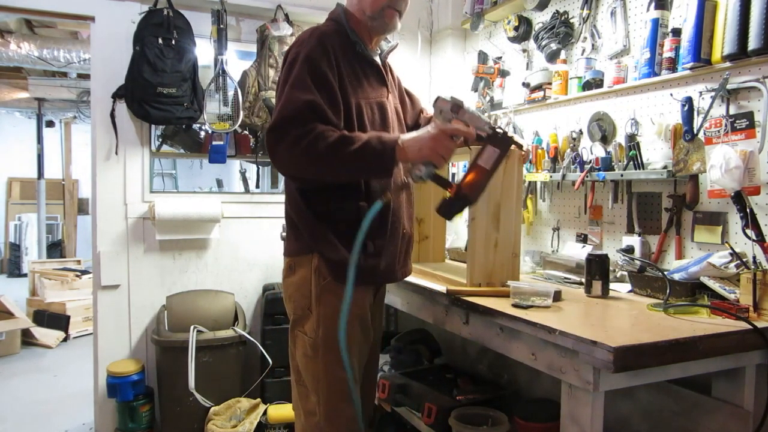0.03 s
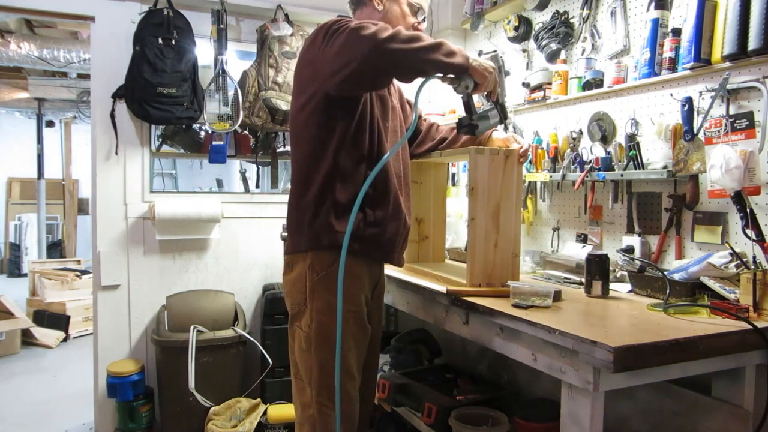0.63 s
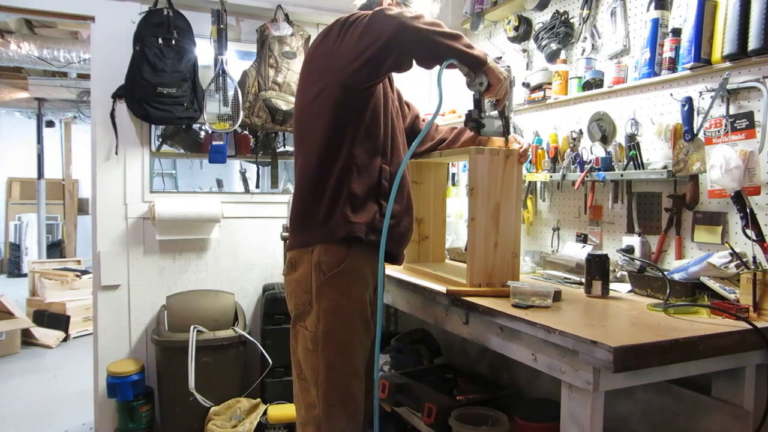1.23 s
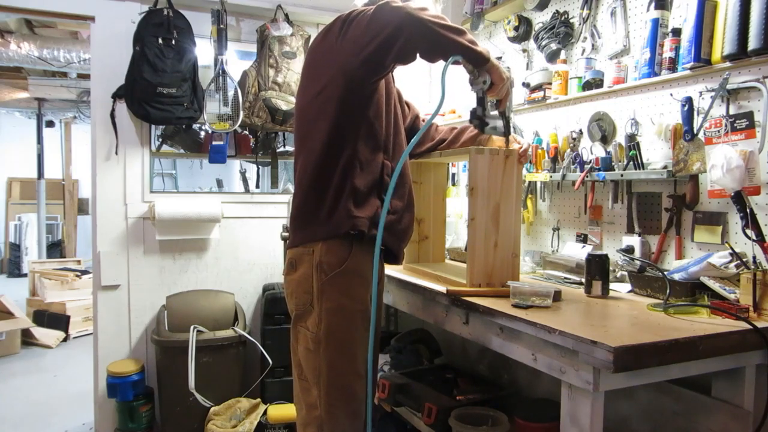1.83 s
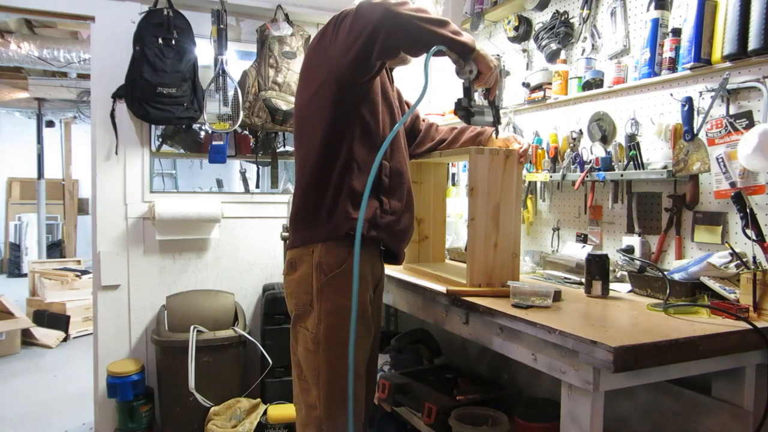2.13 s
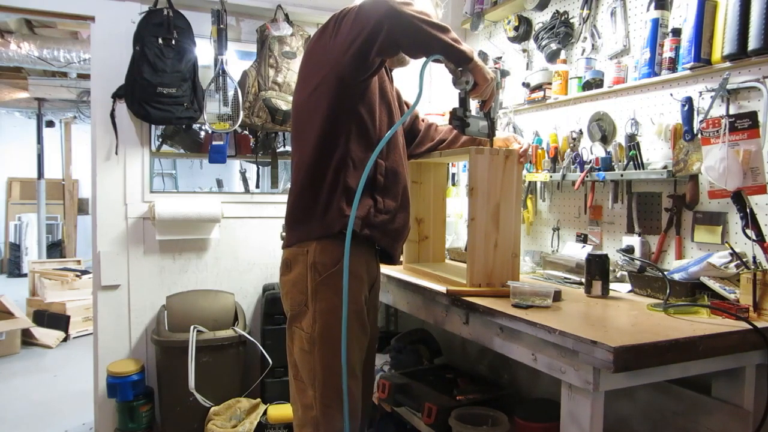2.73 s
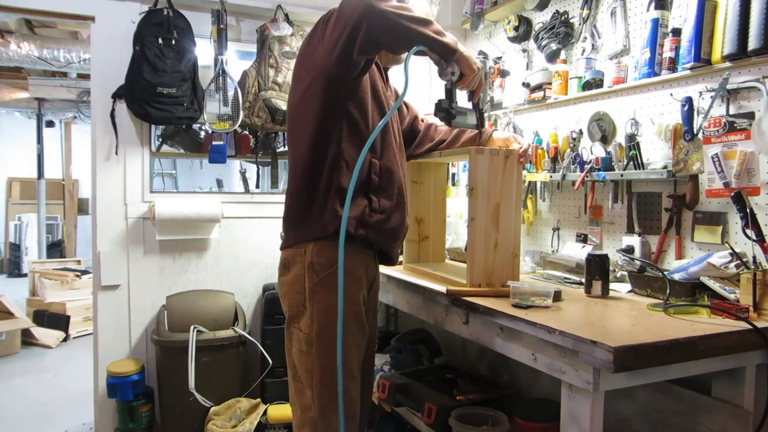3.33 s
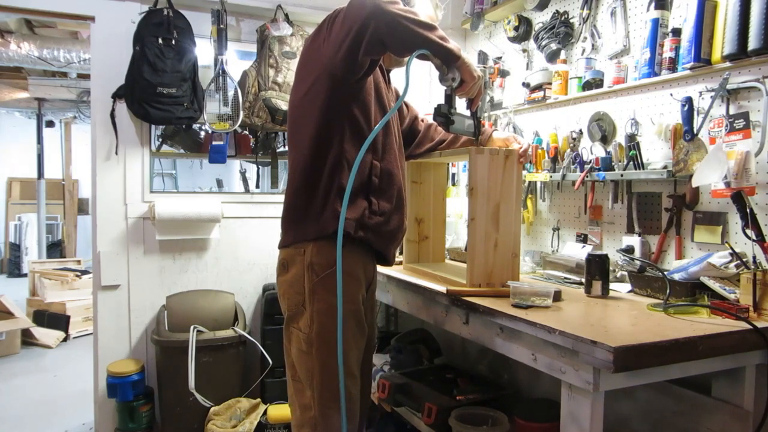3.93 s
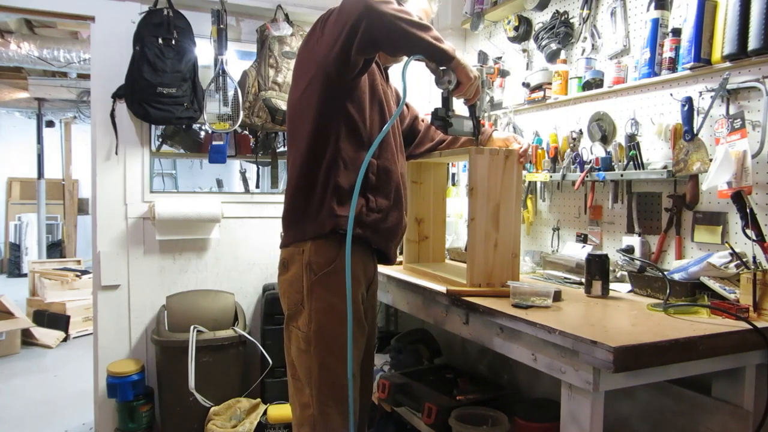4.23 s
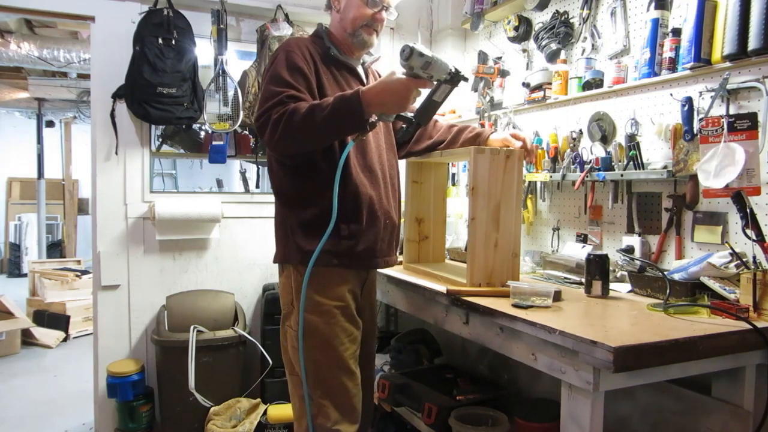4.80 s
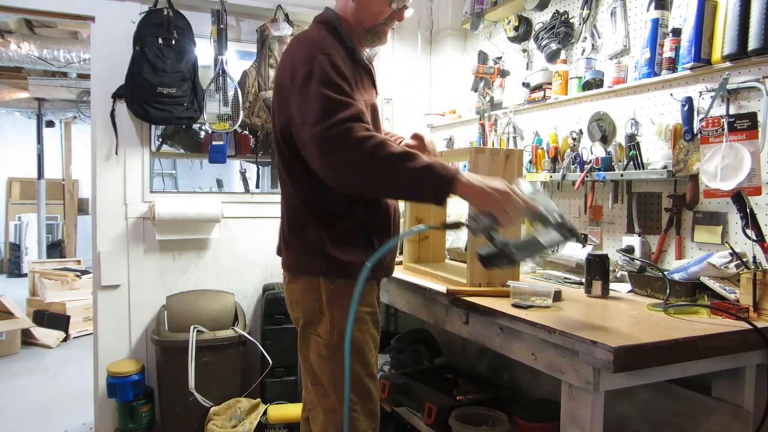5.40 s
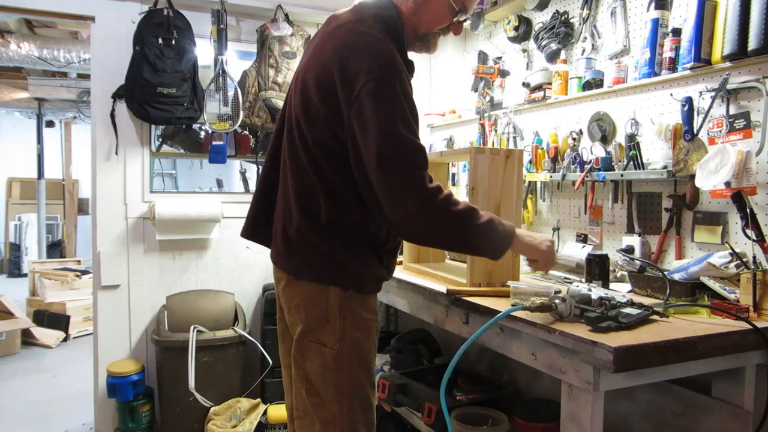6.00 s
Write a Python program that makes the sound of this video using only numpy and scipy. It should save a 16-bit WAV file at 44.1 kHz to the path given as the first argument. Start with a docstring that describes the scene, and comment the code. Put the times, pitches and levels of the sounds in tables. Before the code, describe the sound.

Close by in a small, quiet workshop, an air nailer knocks lightly against a wooden box and fires twice, each loud crack chased by a short hiss of vented air and a low thump. During a pause, a sleeve brushes softly, the tool clicks and the faint room hum swells a little. Three more evenly paced shots follow, with small metallic clicks and wooden taps between them and only a brief echo off the walls.

```python
"""In a small, humming workshop a pneumatic nailer clicks and is set down on a wooden box.
A valve ticks and the driver slams a nail home with a hard crack; as the trigger is let go, the cylinder
vents with a hissing blast. Both blasts carry a rough tone that dives into the bass and ends in a thump.
After the second nail comes a long pause: a sleeve brushes by, the room swells and its thin whistle fades.
Three more nails follow, with light clicks and knocks between them."""
import sys
import numpy as np
from scipy import signal
from scipy.fft import rfft, irfft, next_fast_len
from scipy.io import wavfile

SR = 44100
rng = np.random.default_rng(int(sys.argv[2]) if len(sys.argv) > 2 else 0)


def dump_mix(stems):
    """Bounce the given channels to the path in sys.argv[1] as a 16-bit WAV at rate SR."""
    frames = np.atleast_2d(stems).T  # one column per channel
    limited = np.clip(frames, -1, 1)  # hard clip at full scale
    pcm = np.round(limited * 32767).astype(np.int16)
    wavfile.write(sys.argv[1], SR, pcm)


N = 266893
T = np.arange(SR // 2) / SR  # seconds since an event began

# cues for the driver's blows: t/s, dive length/s, dive end f/Hz
SHOTS = [(0.389, 0.058, 440), (1.354, 0.054, 560), (3.3803, 0.062, 380), (4.4556, 0.058, 270),
         (5.6279, 0.047, 803)]
# cues for the exhaust blasts: t/s, dive length/s, dive end f/Hz, dive gain/dB
VENTS = [(0.532, 0.08, 183.2, -12), (1.4971, 0.06, 657, -11.5), (3.517, 0.066, 139.5, -13),
         (4.589, 0.06, 597.3, -11), (5.757, 0.071, 330.3, -15)]
# cues for trigger and safety tip: t/s, body clack gain/dB, steel tick over the clack/dB
CLICKS = [(0.067, -46.5, 2.5), (0.284, -58.5, 1), (1.04, -48, 3), (1.28, -55, 1), (2.409, -51, 2),
          (2.5, -57.5, -6), (2.53, -60, -0.5), (2.598, -54, -2.5), (3.277, -60.5, 5.5), (3.9, -66, 2.5),
          (3.971, -67, 6), (4.997, -59.5, -1.5), (5.099, -63, -4), (5.139, -54.5, 5), (5.549, -57, 1.5)]
# cues for knocks on the box: t/s, wood thud gain/dB, body clack over the thud/dB
KNOCKS = [(0.131, -39, -3.5), (1.072, -35, -5.5), (2.026, -64.5, -15), (2.786, -47, -18.5),
          (4.234, -48, -1), (5.346, -48, -11.5)]

# noise colours: f/Hz, relative level/dB
VALVE = [(100, -21), (700, -11.5), (2500, -2), (5000, -7), (10000, -10.5), (16000, -20.5)]  # the trigger valve opening
CRACK = [(30, -22), (300, -15.5), (800, -5), (1600, 3.5), (2700, 3.5), (4500, -11), (10000, -22),
         (16000, -31)]  # the driver's impact
SHOT_ECHO = [(60, -24.5), (300, -12.5), (800, -3.5), (2400, -0.5), (4500, -8), (8000, -7.5), (12000, -12.5),
             (16000, -16.5)]  # the shot coming back off the walls
SNAP = [(200, -22), (900, -10), (2000, -3), (2900, 0.5), (4200, -11.5), (9000, -12), (16000, -23.5)]  # the valve's return
EXHAUST = [(60, -20), (300, -5.5), (1000, 0.5), (2500, 0.5), (5000, -7), (8000, -0.5), (12000, -1.5),
           (16000, -11)]  # air dumped from the cylinder
AFTER_HISS = [(100, -30.5), (600, -24.5), (1500, -11.5), (3000, -5), (6500, 1), (10000, -1.5), (16000, -10)]  # a faint hiss that lingers after the blast
THUMP = [(15, 3), (35, 1.5), (90, -4), (200, -11), (500, -40), (2000, -82.5)]  # the rumble that ends a dive
THUD = [(30, -20), (90, -7), (170, 0), (420, -2), (600, -12), (2000, -36), (8000, -70)]  # a touch on wood
CLACK = [(200, -23), (600, -4), (1500, -3), (3000, -3), (4500, -10.5), (10000, -32.5)]  # a touch on the tool's body
TICK = [(1500, -26), (3500, -1), (6500, 0.5), (10000, -7.5), (16000, -18)]  # a touch on steel
SLEEVE = [(200, -10), (900, -9), (2200, 1.5), (4500, -2.5), (8000, -12.5), (15000, -23)]  # brushing cloth
ROOM_AIR = [(20, -16.5), (70, -10.5), (130, -10.5), (220, -17), (500, -15), (1200, -8), (3000, -18),
            (7000, -21.5), (11000, -26), (15000, -34)]  # the room at rest

# the noise band of a dive: f/pitch, level/dB
DIVE_BAND = [(.03, -26.5), (.3, -15.5), (.58, -5), (.85, -1), (1.15, -4), (1.6, -9), (2.5, -17.5), (5, -36),
             (12, -59)]
# a dive's strength as its pitch falls: f/Hz, level/dB
DIVE_LEVEL = [(100, -14), (200, -11.5), (500, -7.5), (1000, -3), (2000, -0.5), (3500, 0), (5500, 1.5),
              (8000, -18)]

# struck resonances: f/Hz, level/dB, t60/s
BOX_MODES = [(158, -2, .16), (345, -1, .22), (440, 2, .16), (550, -10, .12), (660, -9, .11),
             (951, -13, .11), (1443, -16, .11)]  # the wooden box
BODY_MODES = [(334, -8, .3), (760, -8, .17), (950, -6, .16), (1270, -4, .16), (1540, -2, .2),
              (1950, -2, .17), (2262, -1, .18), (2530, -3, .16), (2900, -1, .15), (3200, -1, .17)]  # the nailer's body and magazine
STEEL_MODES = [(3755, -6, .15), (4237, -5, .12), (4452, -6, .15), (5744, -2, .15), (6185, 0, .14),
               (6412, -2, .15), (6930, -5, .15), (7526, -4, .16), (8405, -9, .15), (9788, -7, .17)]  # its small steel parts

# partials of the electric hum: f/Hz, level/dB
HUM_PARTIALS = [(121.5, 0), (78.4, -13.5), (367, -17)]
# peaks of the thin whistle: f/Hz, width/Hz, level/dB
WHISTLE_PEAKS = [(4080, 40, -1.5), (4830, 90, -13), (5070, 93, -2.5), (7300, 90, -16), (7900, 180, -17)]
# the workshop's decay by band: f/Hz, t60/s
ROOM_DECAY = [(100, 0.093), (500, 0.25), (2000, 0.2), (6000, 0.27), (14000, 0.1)]

# stereo width: f/Hz, side minus mid/dB
BLAST_WIDTH = [(100, -31), (1000, -21.5), (2500, -19.5), (5000, -10), (8000, -4), (13000, 0)]
HANDLING_WIDTH = [(60, 3), (150, -4), (380, -4.5), (950, -5.5), (2380, -6), (5980, -5.5), (15000, -2)]
ROOM_WIDTH = [(60, -12.5), (130, -16.5), (400, 0.5), (1400, 3), (7000, -3.5), (15000, -1.5)]
# the right microphone is brighter: f/Hz, left minus right/dB
MIC_BALANCE = [(3000, 0), (6000, -.8), (9000, -1.5)]

SHOT_DIVE_HZ, SHOT_BEND, SHOT_DIVE_DB = 3732, 1.3, -12  # starting pitch, bend (1 = straight fall), gain
VENT_DIVE_HZ, VENT_BEND = 6878, 2.15  # the exhaust dives from higher up, fastest at first
THUMP_PIVOT_HZ, THUMP_DB_PER_OCTAVE = 350, 3.5  # the lower a dive ends, the harder its thump
KNOCK_TICK_DB, KNOCK_RISE_S = -5, 0.032  # a knock's steel tick over its clack; its soft attack
CLICK_THUD_DB = -14.5  # how much of a click reaches the wood
BRUSH_S, BRUSH_WIDTH_S, BRUSH_DB = 1.927, 0.061, -63  # the sleeve, as the tool moves to the next nail
HUM_DB, AIR_DB, WHISTLE_DB = -80, -72, -72  # the room tone at rest
WHINE_HZ, WHINE_DB = 15734, -15  # a faint electronic whine, relative to the hum
SWELL_PEAK_S, SWELL_RISE_S, SWELL_FALL_S = 3.2, 1.46, 0.8  # hum and air swell once, in the long pause
HUM_SWELL_DB, AIR_SWELL_DB = 12.5, 9
WHISTLE_GAP_S, WHISTLE_GAP_WIDTH_S, WHISTLE_GAP_DB = 3.15, 0.45, -15.5  # the whistle briefly fades
LOW_CUT_HZ, HIGH_CUT_HZ = 18, 15950


def nail_shots():
    """The trigger valve ticks, the driver slams the nail home, and box, tool and room ring."""
    out = np.zeros((2, N))
    for s, length, end_hz in SHOTS:
        add(out, s - .0045, amp(-35) * noise(VALVE) * fade(0.063))
        crack = noise(CRACK) * fade(0.025, hold=0.0012)
        add(out, s, amp(-2.5) * crack / np.std(crack[:, :SR // 500]))  # level set on the first 2 ms
        add(out, s, amp(-19) * room_burst(SHOT_ECHO, hold=0.018, stretch=0.73))
        ringing = amp(-34) * ring(BOX_MODES) + amp(-24) * ring(BODY_MODES) + amp(-27) * ring(STEEL_MODES)
        add(out, s, ringing * fade(.2))  # the hand damps box and tool
        add(out, s, amp(-42.5) * noise(SHOT_ECHO) * fade(0.31))  # the room's late tail
        tone = dive(length, SHOT_DIVE_HZ, end_hz, SHOT_BEND, side_db=-27)
        add(out, s, amp(SHOT_DIVE_DB) * tone * attack(.035))
        add(out, s + length - .002, amp(-30.5) * thump(end_hz))
    return out


def exhaust_blasts():
    """The valve snaps back and the cylinder dumps its air; a faint hiss lingers after the blast."""
    out = np.zeros((2, N))
    for s, length, end_hz, dive_db in VENTS:
        snap = amp(-25) * noise(SNAP) * fade(0.031) + amp(-34) * ring(BODY_MODES)
        add(out, s - .0048, snap * fade(0.041))
        add(out, s, amp(-17) * room_burst(EXHAUST, hold=0.029, stretch=0.62) * attack(0.015))
        add(out, s, amp(-29) * ring(STEEL_MODES))
        shut_off = fade(.22, hold=.195)
        add(out, s, amp(-43) * noise(AFTER_HISS) * fade(1.9) * shut_off)
        tone = dive(length, VENT_DIVE_HZ, end_hz, VENT_BEND, side_db=-28.5)
        add(out, s, amp(dive_db) * tone * attack(0.033))
        add(out, s + length - .002, amp(-31.5) * thump(end_hz))
    return out


def dive(length, start_hz, end_hz, bend, side_db, evenness=0.92):
    """A rough tone: a narrow band of noise sweeps down in pitch, then stops short."""
    glide = end_hz + (start_hz - end_hz) * np.maximum(1 - T / length, 0) ** bend
    stumble = np.interp(T, np.arange(100) / 250, rng.standard_normal(100))  # a new lurch every 4 ms
    pitch = glide * np.exp(.19 * stumble)
    size, per_cycle = 32768, 32  # samples in the noise band, and per cycle of the pitch
    multiple = np.fft.fftfreq(size, 1 / per_cycle)
    shape = amp(along(DIVE_BAND, multiple)) * (multiple > 0)
    band = unit(np.fft.ifft(np.fft.fft(rng.standard_normal((2, size))) * shape))
    compressed = unit(band.real / (np.abs(band) + 0.18) ** evenness)  # flatten the band's swells
    playhead = np.cumsum(pitch) / SR * per_cycle
    mid, side = [np.interp(playhead, np.arange(size), channel) for channel in compressed]
    tone = mid + amp(side_db) * np.array([side, -side])
    return tone * amp(along(DIVE_LEVEL, pitch)) * fade(0.0017, hold=length - .002)


def thump(end_hz, swing_hz=30):
    """The low push that ends a dive: one slow swing over a short rumble."""
    swing = np.sin(2 * np.pi * swing_hz * T) * fade(.07)
    rumble = amp(-1) * noise(THUMP) * fade(0.018, hold=0.0024) * attack(.03)
    return amp(THUMP_DB_PER_OCTAVE * np.log2(THUMP_PIVOT_HZ / end_hz)) * (swing + rumble)


def ring(modes, scatter_db=2.5):
    """Struck modes, at new strengths for each blow and each channel; rms 1 over the first 20 ms."""
    hz, db, t60 = np.transpose(modes)[..., None]
    blow_db = db + scatter_db * rng.standard_normal(hz.shape)
    strength = amp(blow_db + rng.standard_normal((2,) + hz.shape))
    phase = 2 * np.pi * (hz * T + rng.random(hz.shape))
    sound = np.sum(strength * np.sin(phase) * fade(t60), axis=1) * attack(0.0054)
    return sound / np.std(sound[:, :SR // 50])


def room_burst(spectrum, hold, stretch, spread=BLAST_WIDTH):
    """A hit smeared by close walls: it holds through the first echoes, then dies in stretch * room t60."""
    hz, t, bands = signal.stft(noise(spectrum, spread=spread), SR, nperseg=256)
    t60 = stretch * along(ROOM_DECAY, hz)[:, None]
    decay_db = -60 * np.maximum(t - hold, 0) / t60
    _, sound = signal.istft(bands * amp(decay_db), SR, nperseg=256)
    return sound[:, :len(T)]


def handling():
    """The nose settles on the wood; trigger and safety tip click and ring the tool."""
    out = np.zeros((2, N))
    for s, thud_db, clack_over_db in KNOCKS:
        clack_db = thud_db + clack_over_db
        add(out, s, touch(thud_db, clack_db, clack_db + KNOCK_TICK_DB) * attack(KNOCK_RISE_S))
    for s, clack_db, tick_over_db in CLICKS:
        add(out, s, touch(clack_db + CLICK_THUD_DB, clack_db, clack_db + tick_over_db))
    return out


def touch(thud_db, clack_db, tick_db):
    """One light contact in three layers: the wood thuds, the tool's body clacks, its steel ticks."""
    thud = room_burst(THUD, hold=0.0091, stretch=0.9, spread=HANDLING_WIDTH)
    thud += amp(-2) * ring(BOX_MODES) * fade(0.25)
    clack = room_burst(CLACK, hold=.014, stretch=.75, spread=HANDLING_WIDTH)
    clack += amp(-3) * ring(BODY_MODES)
    tick = room_burst(TICK, hold=.008, stretch=.72, spread=HANDLING_WIDTH)
    tick += amp(-7) * ring(STEEL_MODES)
    tick += amp(2.5) * noise(TICK) * fade(0.011)  # the sharp edge of the contact
    return amp(thud_db - 5.5) * thud + amp(clack_db - 3) * clack + amp(tick_db - 1.5) * tick


def sleeve_brush():
    """Cloth rubs past in one soft swish."""
    return amp(BRUSH_DB) * bump(BRUSH_S, BRUSH_WIDTH_S) * noise(SLEEVE, size=N, spread=HANDLING_WIDTH)


def electric_hum(t):
    """Low partials, each wavering slowly in pitch, under a steady high whine."""
    hum = np.zeros(N)
    for hz, db in HUM_PARTIALS:
        waver = noise([(1, 0.5), (8, -6), (30, -81)], size=N)[0]
        drift_cycles = 0.3 * np.cumsum(waver) / SR
        hum += amp(db) * np.sin(2 * np.pi * (hz * t + drift_cycles))
    return unit(hum) + amp(WHINE_DB) * unit(np.sin(2 * np.pi * WHINE_HZ * t))


def thin_whistle():
    """Noise through narrow resonances, perhaps a leak in the air line; it fades away for a moment."""
    def peaks(f):
        return sum(amp(db) / np.hypot(1, 2 * (f - hz) / abs(width)) for hz, width, db in WHISTLE_PEAKS)
    level_db = WHISTLE_DB + WHISTLE_GAP_DB * bump(WHISTLE_GAP_S, WHISTLE_GAP_WIDTH_S)
    return amp(level_db) * stereo_noise(peaks, N, ROOM_WIDTH)


def room_tone():
    """The bed of hum, whistle and air; hum and air swell once, and all three duck after each blast."""
    t = np.arange(N) / SR
    swell = np.interp(t - SWELL_PEAK_S, [-SWELL_RISE_S, 0, SWELL_FALL_S], [0, 1, 0])
    hum = amp(HUM_DB + HUM_SWELL_DB * swell) * electric_hum(t)
    whistle = thin_whistle()
    air = amp(AIR_DB + AIR_SWELL_DB * swell) * noise(ROOM_AIR, size=N, spread=ROOM_WIDTH)
    duck = np.max([(t > s) * np.exp(-np.abs(t - s) / .13) for s, *_ in [*SHOTS, *VENTS]], axis=0)
    return amp(-22 * duck) * (hum + whistle + air)


def noise(spectrum, size=len(T), spread=BLAST_WIDTH):
    """Stereo noise coloured by a table of f/Hz, level/dB."""
    return stereo_noise(lambda hz: amp(along(spectrum, hz)), size, spread)


def stereo_noise(gain, size, spread):
    """Noise of rms 1 shaped by gain(Hz); the spread table sets its width in each band."""
    hz = np.fft.rfftfreq(size, 1 / SR)
    mid, side = rfft(rng.standard_normal((2, size)))
    width = amp(along(spread, hz))
    left_right = np.array([mid + width * side, mid - width * side]) / np.hypot(1, width)
    return unit(irfft(left_right * gain(hz), size))


def fade(t60, hold=0):
    """Full level for hold seconds, then an exponential decay."""
    return amp(-60 * np.maximum(T - hold, 0) / t60)


def attack(seconds):
    """A fade-in that starts fast and eases up to full level."""
    return 1 - fade(seconds)


def bump(s, width):
    """A smooth rise to 1 at time s and back."""
    return np.exp(-((np.arange(N) / SR - s) / width) ** 2)


def amp(db):
    """Decibels to gain."""
    return 10 ** (np.asarray(db) / 20)


def unit(x):
    """Scale to rms 1."""
    return x / np.sqrt(np.mean(np.abs(x) ** 2) + 1e-20)


def along(points, hz):
    """Read a curve on a log frequency axis."""
    f, values = np.transpose(points)
    return np.interp(np.log(np.maximum(hz, 1e-6)), np.log(f), values)


def add(track, s, sound):
    """Mix a sound into the track at time s."""
    start = max(round(s * SR), 0)
    track[:, start:start + sound.shape[-1]] += sound[..., :N - start]


def scene():
    """The nailer at the bench, in the hum of the room."""
    return nail_shots() + exhaust_blasts() + handling() + sleeve_brush() + room_tone()


def record(dry):
    """The cracks overload and soft-clip; two slightly unlike microphones, with sub-bass and top cut."""
    clipped = dry / (1 + np.abs(dry) ** 6) ** (1 / 6)
    size = next_fast_len(N + SR // 4)
    hz = np.fft.rfftfreq(size, 1 / SR)
    colour = amp(np.outer([.5, -.5], along(MIC_BALANCE, hz)))
    low_cut = 1j * hz / (1j * hz + LOW_CUT_HZ)
    high_cut = np.clip((HIGH_CUT_HZ - hz) / 300 + .5, 0, 1)
    return irfft(rfft(clipped, size) * colour * low_cut * high_cut, size)[:, :N]


dry = scene()
out = record(dry)
dump_mix(out)
```